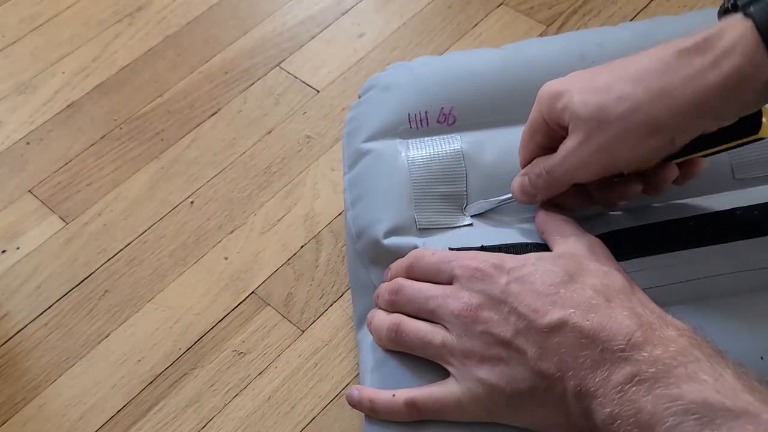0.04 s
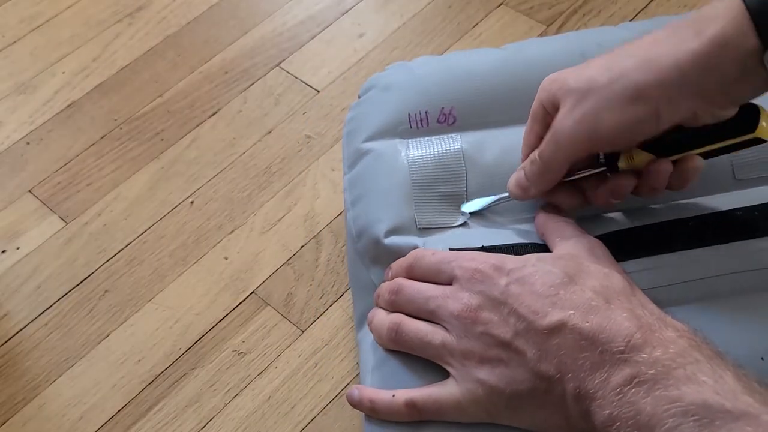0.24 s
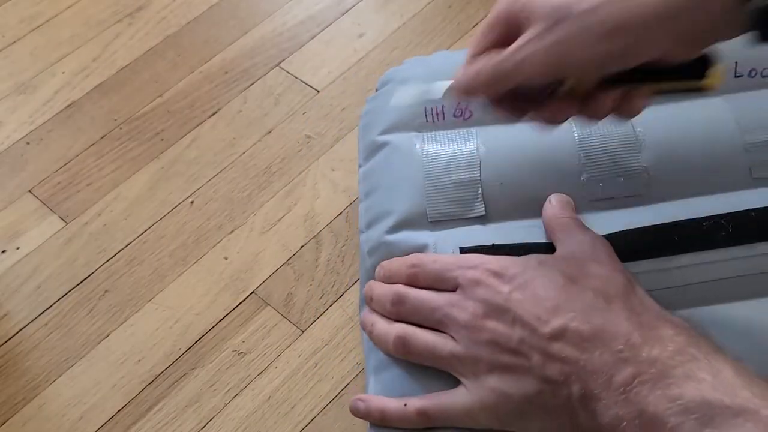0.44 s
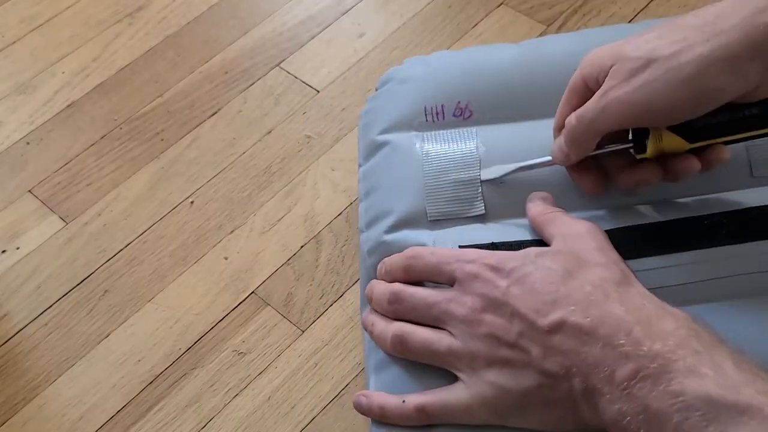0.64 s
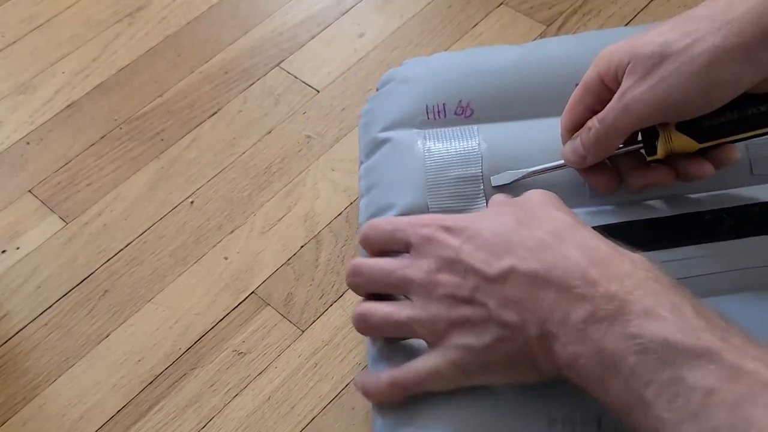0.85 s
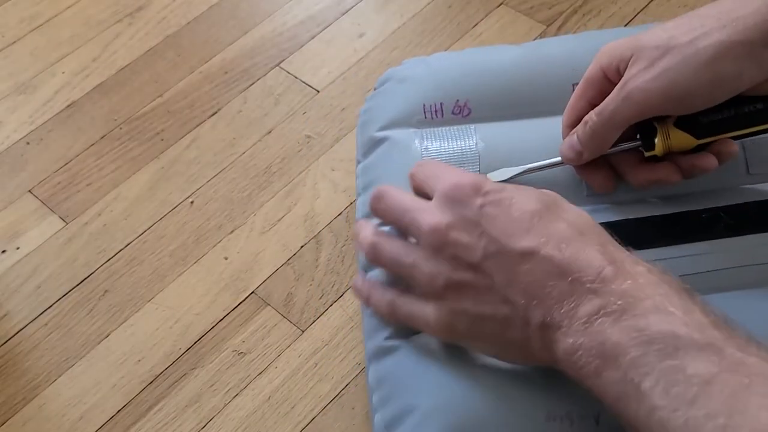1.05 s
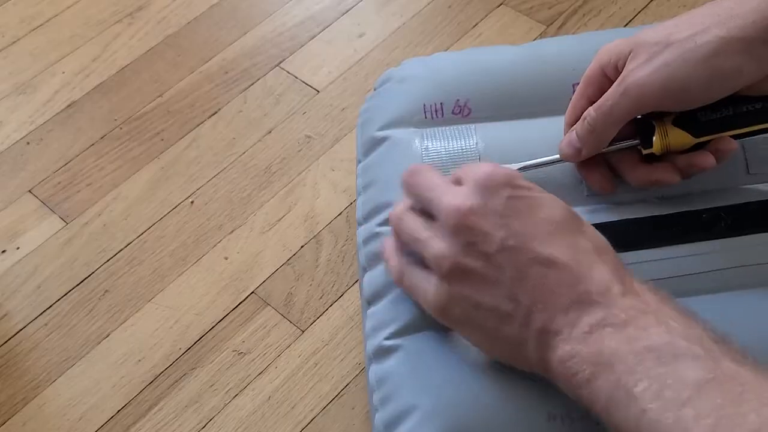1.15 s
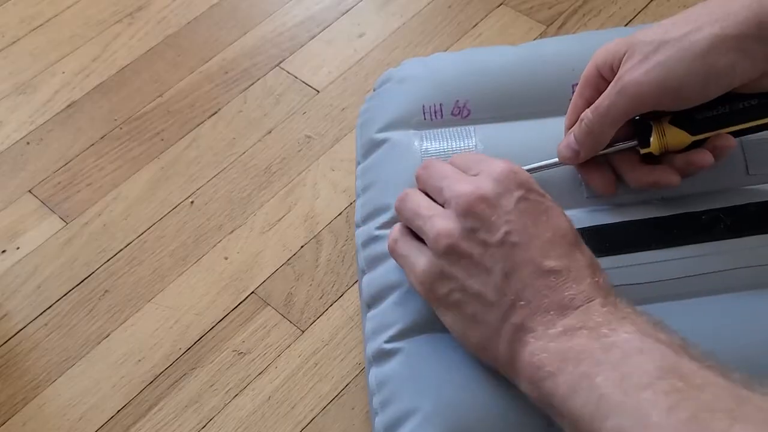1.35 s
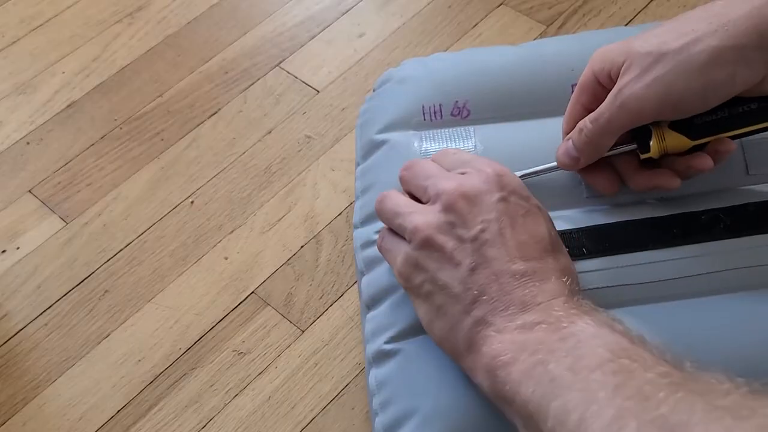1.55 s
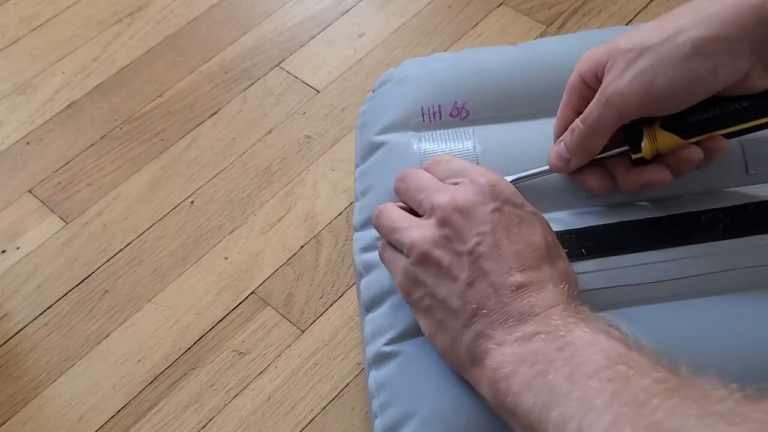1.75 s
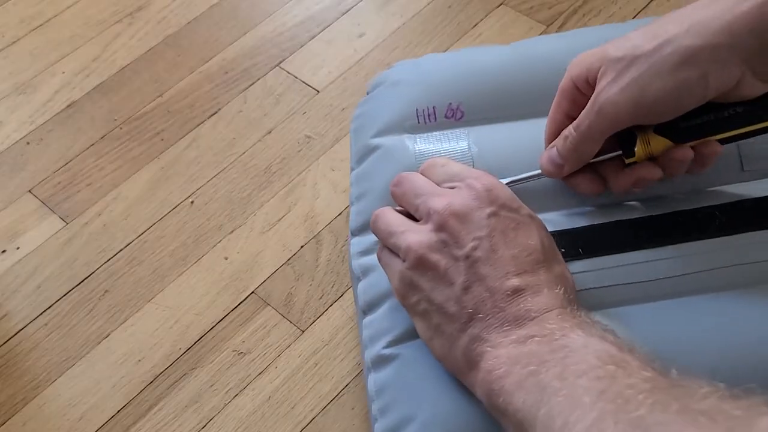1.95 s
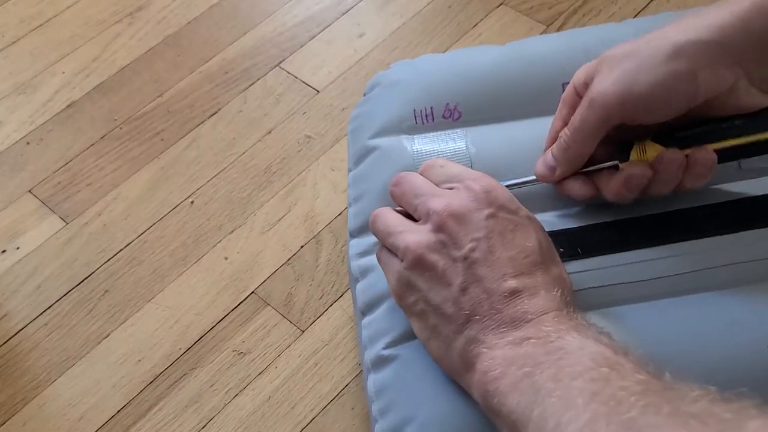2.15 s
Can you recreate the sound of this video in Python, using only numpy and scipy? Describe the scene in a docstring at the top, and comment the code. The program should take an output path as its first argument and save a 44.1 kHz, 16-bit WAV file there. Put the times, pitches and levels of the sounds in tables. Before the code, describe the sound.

A hollow thump as a tool slips on an air cushion, followed by light handling.

```python
"""A faint rub and light taps, then a thump: a screwdriver slips on an inflated vinyl cushion.
The blade drums the taut skin and scrapes over a ribbed tape patch; the air chamber rings.
Blade and fingers tap, tick, squeak and rub as they settle. The cushion lies on a wooden floor
in a room with a low rumble. The right microphone faces the work; the left one hears it dull."""
import sys
import numpy as np
from scipy import signal
from scipy.fft import rfft, irfft, next_fast_len
from scipy.io import wavfile
from scipy.ndimage import map_coordinates

SR = 44100
rng = np.random.default_rng(int(sys.argv[2]) if len(sys.argv) > 2 else 0)


def dump_mix(stems):
    """Bounce the given channels to the path in sys.argv[1] as a 16-bit WAV at rate SR."""
    frames = np.atleast_2d(stems).T  # one column per channel
    limited = np.clip(frames, -1, 1)  # hard clip at full scale
    pcm = np.round(limited * 32767).astype(np.int16)
    wavfile.write(sys.argv[1], SR, pcm)


N = 97020

# blade catching on the skin (time [s], level [dB], contact length [s])
BLADE_SLIPS = [(0.2405, -7, 0.00724), (0.2889, -15.5, 0.00536)]
# skin modes under the blade (frequency [Hz], relative level [dB])
SKIN_MODES = [(175, -14), (400, -25), (540, 1.5), (1040, -6.5), (1410, -18)]
# air chamber modes (frequency [Hz], relative level [dB], t60 [s])
CHAMBER_MODES = [(69.5, -11, 1), (184.7, -5, 0.27), (295, 0.5, 0.44), (370.7, -1, 0.2), (470.5, -3, 0.28),
                 (666, -14, 0.85), (828, -6.5, 0.38), (1049, -8, 0.24)]
# dragged skin (peak time [s], half length [s], level [dB], pitch [Hz])
SKIN_GROANS = [(.282, 0.018, -13, 555), (.279, 0.021, -25, 107), (.275, 0.018, -24.5, 210),
               (.327, 0.017, -26.5, 298)]
# steel on tape (frequency [Hz], relative level [dB])
SCRAPE_SPECTRUM = [(1000, -7), (3300, 6.5), (4700, -4), (6000, 4.5), (7300, -1.5), (15000, -1)]

# blade and fingers on vinyl (time [s], relative body level [dB], relative snap level [dB])
VINYL_TAPS = [(.055, -31, -46.5), (.068, -34.5, -49.5), (0.2436, -26, -28), (0.3794, -19, -27),
              (0.4018, -33, -44), (0.4133, -21, -27), (.4425, -28, -42), (.448, -40, -32),
              (0.4917, -38.5, -45.5), (.611, -32.5, -45), (.626, -30.5, -51), (0.6447, -31, -42),
              (.721, -39.5, -48.5), (0.7354, -29, -40), (.832, -35, -59), (0.9607, -30.5, -40.5),
              (1.102, -43, -45), (1.235, -49, -50), (1.5286, -43, -59.5), (1.767, -42.5, -53),
              (1.825, -41, -46.5), (1.959, -42, -60), (2.05, -41.5, -62), (2.134, -35, -39),
              (2.141, -36, -42.5)]
# dull part of a tap (frequency [Hz], relative level [dB])
BODY_SPECTRUM = [(60, -21), (250, -8.5), (550, 0.5), (1050, -3), (1600, -15), (3000, -65.5)]
# snap of a tap or crease (frequency [Hz], relative level [dB])
SNAP_SPECTRUM = [(300, -44.5), (1000, -4.5), (1600, 16), (2600, 9.5), (3700, 5.5), (5500, -9.5),
                 (9500, -17), (15000, -56)]

# blade or hand sliding on vinyl (peak time [s], rise [s], fall [s], crinkle [dB], hiss [dB])
SLIDE_STROKES = [(.005, 0.075, 0.062, -44.5, -71), (0.279, 0.051, 0.065, -23, -48.5),
                 (0.442, 0.18, 0.076, -36.5, -55.5), (0.629, 0.069, 0.054, -52, -72.5),
                 (.745, 0.063, 0.084, -48.5, -72.5), (0.861, 0.065, 0.1, -53, -74),
                 (0.984, 0.052, 0.043, -48.5, -65), (1.208, 0.091, 0.15, -56, -75.5),
                 (2.011, 0.065, 0.068, -51.5, -60.5), (2.156, 0.036, 0.22, -45, -63.5)]
# crinkling skin (frequency [Hz], relative level [dB])
CRINKLE_SPECTRUM = [(60, -6.5), (200, -3), (550, 1.5), (1400, -6.5), (2100, -25), (3400, -27.5),
                    (5000, -35.5), (12000, -50)]
# friction hiss (frequency [Hz], relative level [dB])
HISS_SPECTRUM = [(800, -22), (2500, 5), (4500, 3), (6500, -3), (9300, 0.5), (10400, -6), (15000, -29)]
GRAINS_PER_S = 1700

# blade or skin sticking and letting go (time [s], level [dB], pitch [Hz])
STICK_SQUEAKS = [(0.4426, -39.5, 2716), (.645, -35.5, 480), (1.101, -40, 1325), (1.138, -45, 1286),
                 (1.232, -44, 1770), (1.238, -49, 2340), (1.528, -54.5, 1310), (1.767, -54, 2440),
                 (1.825, -52.5, 2880), (2.003, -37.5, 550), (2.019, -34.5, 559)]
# blade edge on tape (time [s], relative level [dB])
EDGE_TICKS = [(0.057, -47), (0.238, -35), (.247, -35), (1.487, -35), (1.5001, -34.5), (1.906, -54)]
# edge tick (frequency [Hz], relative level [dB])
TICK_SPECTRUM = [(1500, -42), (4000, -15), (6500, -15), (8700, -0.5), (11500, -5.5), (15000, -9.5)]
# blade and tape resonances (frequency [Hz], relative level [dB])
RASP_MODES, RASP_WIDTH_HZ = [(3200, 0), (4150, -0.69), (5550, -2.2)], 98

# shadow at the left microphone (frequency [Hz], gain [dB])
LEFT_SHADOW = [(300, 1.5), (550, -4.5), (1000, -7), (2500, -10), (4500, -19), (8000, -48.5), (12000, -29),
               (15000, -19)]
# room decay (frequency [Hz], t60 [s])
ROOM_DECAY = [(100, 0.19), (500, 0.32), (2000, 0.34), (6000, 0.31), (14000, 0.17)]
# left-right likeness of the room's sound (frequency [Hz], correlation [0..1])
ROOM_COHERENCE = [(100, 0.95), (280, 0.81), (600, 0.034)]
# room rumble (frequency [Hz], relative level [dB])
RUMBLE_SPECTRUM = [(25, -39), (45, -8), (70, -2), (100, -1), (150, -10), (250, -17), (380, -12.5),
                   (520, -19.5), (1250, -28), (2000, -39), (4000, -47.5), (7000, -60.5), (12000, -57)]


def slips():
    """Each catch of the blade drums the skin's modes under a half-sine swell."""
    track, t = np.zeros(N), np.arange(SR // 4) / SR
    modes = sum(amp(db) * np.sin(2 * np.pi * hz * t) for hz, db in SKIN_MODES)
    for time_s, db, contact_s in BLADE_SLIPS:
        swell = np.sin(np.pi * np.minimum(t / contact_s, 1))
        add(track, time_s, amp(db) * swell * modes)
    return track


def chamber(gain_db=-24, rise_s=0.045):
    """The air chamber builds up from the first slip, then rings out."""
    track, t = np.zeros(N), np.arange(SR) / SR
    free_s = np.maximum(t - rise_s, 0)
    ring = sum(amp(db - 60 * free_s / t60_s) * np.sin(2 * np.pi * (hz * t + rng.random()))
               for hz, db, t60_s in CHAMBER_MODES)
    add(track, BLADE_SLIPS[0][0], amp(gain_db) * ring * np.minimum(t / rise_s, 1))
    return track


def groans(waver_cycles=0.054):
    """Dragged and pressed by the blade, the skin sounds short, unsteady tones."""
    track, t = np.zeros(N), np.arange(N) / SR
    for peak_s, half_s, db, hz in SKIN_GROANS:
        tone = np.sin(2 * np.pi * (hz * t + waver_cycles * wobble(hz / 2)))
        track += amp(db) * stroke(peak_s, half_s, half_s) * tone
    return track


def scrape(peak_db=-38.5):
    """The steel edge zips over the ribbed tape: a swell of bright noise."""
    swell = stroke(peak_s=0.298, rise_s=0.08, fall_s=0.062, power=3.3)
    return amp(peak_db) * swell * unit(coloured(rng.standard_normal(N), SCRAPE_SPECTRUM))


def taps(body_gain_db=15, snap_gain_db=14, scatter_db=0.5, delay_s=0.001195, cutoff_hz=6500):
    """A dull push and a brighter snap scatter through the skin; soft vinyl rounds off the top."""
    body, snap = np.zeros(N), np.zeros(N)
    for time_s, body_db, snap_db in VINYL_TAPS:
        for track, db in (body, body_db + body_gain_db), (snap, snap_db + snap_gain_db):
            contact = amp(scatter_db) * burst(t60_s=0.035)
            contact[0] += 1  # direct impulse
            add(track, time_s + delay_s, amp(db) * contact)
    hits = coloured(body, BODY_SPECTRUM) + coloured(snap, SNAP_SPECTRUM)
    return signal.lfilter(*signal.butter(2, cutoff_hz, fs=SR), hits)


def sliding(grain_floor=0.16, creases_per_s=120, crease_db=-14, flutter_db=3.5):
    """Stick-slip grains crinkle the skin and creases snap under a fine hiss."""
    grains = rng.standard_normal(N) * (sparse(GRAINS_PER_S) + grain_floor)
    creases = rng.choice([-1, 1], N) * sparse(creases_per_s)
    crinkle = unit(coloured(grains, CRINKLE_SPECTRUM))
    crinkle += amp(crease_db) * unit(coloured(creases, SNAP_SPECTRUM))
    hiss = unit(coloured(rng.standard_normal(N), HISS_SPECTRUM)) * amp(flutter_db * wobble(200))
    return sum(stroke(peak_s, rise_s, fall_s) * (amp(crinkle_db) * crinkle + amp(hiss_db) * hiss)
               for peak_s, rise_s, fall_s, crinkle_db, hiss_db in SLIDE_STROKES)


def squeaks(rise_s=0.003, waver_cycles=0.16):
    """Blade or skin sticks and lets go: brief wavering tones."""
    track, t = np.zeros(N), np.arange(SR // 8) / SR
    swell = t / rise_s * np.exp(1 - t / rise_s)
    for time_s, db, hz in STICK_SQUEAKS:
        cycles = hz * t + waver_cycles * wobble(hz / 3)[:len(t)]
        add(track, time_s, amp(db) * swell * np.sin(2 * np.pi * cycles))
    return track


def ticks(gain_db=8):
    """The blade's edge flicks over the tape: tiny sharp bursts."""
    track = np.zeros(N)
    for time_s, db in EDGE_TICKS:
        add(track, time_s, amp(db + gain_db) * burst(t60_s=0.02))
    return coloured(track, TICK_SPECTRUM)


def rasp(peak_db=-57.5):
    """A rub over the ribs: stick-slip grains ring narrow resonances of blade and tape."""
    def resonances(hz):
        damping = 1j * hz * RASP_WIDTH_HZ
        return sum(amp(db) * damping / (mode_hz ** 2 - hz ** 2 + damping) for mode_hz, db in RASP_MODES)

    grains = rng.standard_normal(N) * sparse(GRAINS_PER_S)
    swell = stroke(peak_s=2.008, rise_s=0.033, fall_s=0.052)
    return amp(peak_db) * swell * unit(filtered(grains, resonances))


def reverb(x, predelay_samples=SR // 200):
    """The room's stereo tail: decaying noise, alike on both sides in the bass only."""
    hz, t, spectra = signal.stft(rng.standard_normal((2, SR // 2)), SR, nperseg=256)
    decay = amp(-60 * t / along(ROOM_DECAY, hz)[:, None])
    mid, side = signal.istft(spectra * decay * mid_side_gains(hz)[..., None], SR, nperseg=256)[1]
    tail = np.array([mid + side, mid - side]) / np.linalg.norm(mid + side)
    return signal.fftconvolve(np.pad(x, (predelay_samples, 0))[None], tail, axes=1)[:, :N]


def room_noise(rumble_db=-47.5, hum_hz=93.8, hum_db=-52.5, waver_db=1.3, drift_cycles=0.21):
    """Low stereo rumble with a wavering hum at the centre."""
    noise = rng.standard_normal((2, N))
    mid, side = filtered(noise, lambda hz: amp(along(RUMBLE_SPECTRUM, hz)) * mid_side_gains(hz))
    rumble = np.array([mid + side, mid - side])
    waver = amp(waver_db * wobble(8.58))
    hum = waver * np.sin(2 * np.pi * (hum_hz * np.arange(N) / SR + drift_cycles * wobble(8.11)))
    return amp(rumble_db) * unit(rumble) + amp(hum_db) * unit(hum)


def mid_side_gains(hz):
    """Mid and side gains that give the room's left-right correlation."""
    angle_rad = np.arccos(along(ROOM_COHERENCE, hz)) / 2
    return np.array([np.cos(angle_rad), np.sin(angle_rad)])


def stroke(peak_s, rise_s, fall_s, power=1.24):
    """Friction envelope: 0 to 1 to 0."""
    return np.interp(np.arange(N) / SR, [peak_s - rise_s, peak_s, peak_s + fall_s], [0, 1, 0]) ** power


def burst(t60_s):
    """Decaying noise of energy 1."""
    t = np.arange(SR // 4) / SR
    noise = rng.standard_normal(len(t)) * amp(-60 * t / t60_s)
    return noise / np.linalg.norm(noise)


def sparse(events_per_s):
    """Random one-sample gates."""
    return rng.random(N) < events_per_s / SR


def wobble(knots_per_s):
    """Smooth random curve."""
    knots = rng.standard_normal(int(N * knots_per_s / SR) + 4)
    return map_coordinates(knots, [np.arange(N) * knots_per_s / SR])


def coloured(x, spectrum, size=4096):
    """x through a minimum-phase filter of energy 1."""
    cepstrum = irfft(np.log(amp(along(spectrum, np.fft.rfftfreq(size, 1 / SR)))))
    cepstrum[1:size // 2] *= 2
    cepstrum[size // 2 + 1:] = 0
    pulse = irfft(np.exp(rfft(cepstrum)))
    return signal.fftconvolve(x, pulse / np.linalg.norm(pulse))[:N]


def filtered(x, response):
    """x with its spectrum multiplied by response(hz)."""
    size = next_fast_len(N + SR // 2)
    return irfft(rfft(x, size) * response(np.fft.rfftfreq(size, 1 / SR)), size)[..., :N]


def along(points, hz):
    """Interpolate (frequency [Hz], value) points on a log axis."""
    knots_hz, values = np.transpose(points)
    return np.interp(np.log(hz + 1), np.log(knots_hz + 1), values)


def add(track, time_s, sound):
    """Mix a sound in at time_s."""
    part = track[round(time_s * SR):][:len(sound)]
    part += sound[:len(part)]


def amp(db):
    """Decibels to gain."""
    return 10 ** (np.asarray(db) / 20)


def unit(x):
    """Scale to rms 1."""
    return x / np.sqrt(np.mean(x ** 2) + 1e-20)


def scene(reverb_db=-6.5, left_lag_s=0.00012):
    """Handling and chamber ring, shadowed and late on the left, over the room noise."""
    work = slips() + groans() + rasp() + scrape() + sliding() + ticks() + taps() + squeaks()
    left, right = work + chamber() + amp(reverb_db) * reverb(work)
    left = filtered(left, lambda hz: amp(along(LEFT_SHADOW, hz)) * np.exp(-2j * np.pi * hz * left_lag_s))
    return np.array([left, right]) + room_noise()


def record(dry, cutoff_hz=15200):
    """Brick-wall low-pass."""
    return filtered(dry, lambda hz: hz < cutoff_hz)


dry = scene()
out = record(dry)
dump_mix(out)
```